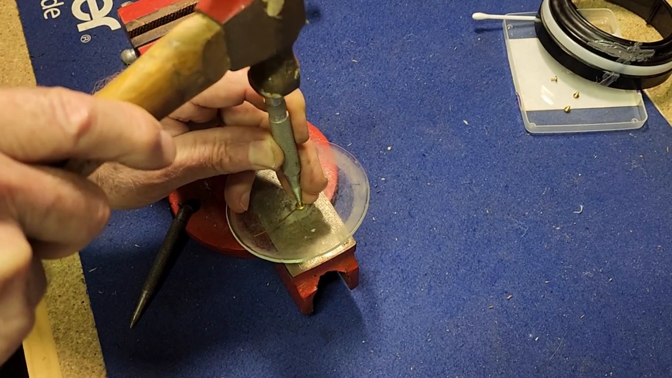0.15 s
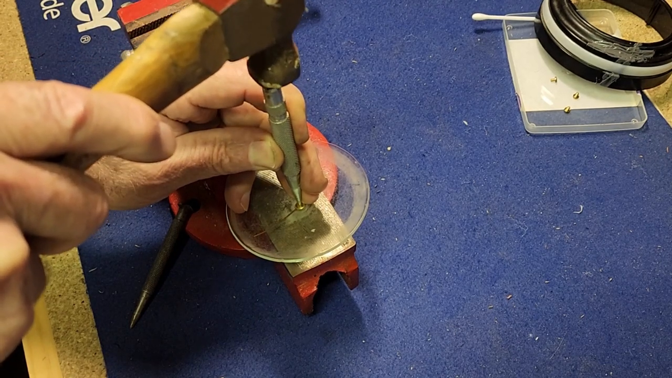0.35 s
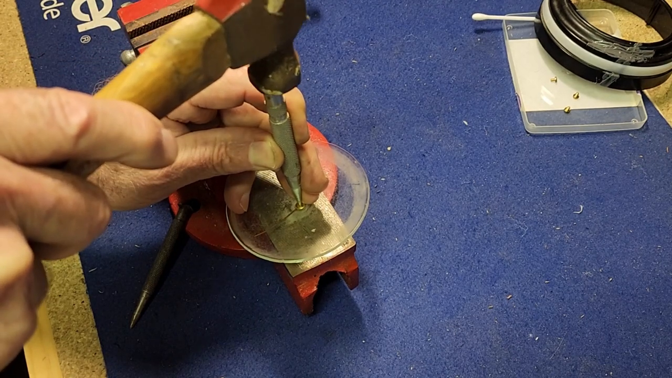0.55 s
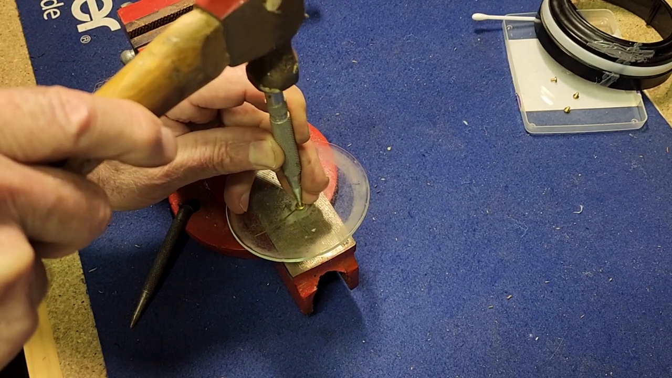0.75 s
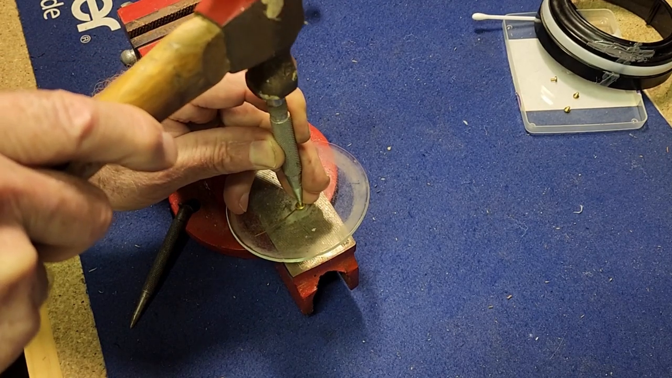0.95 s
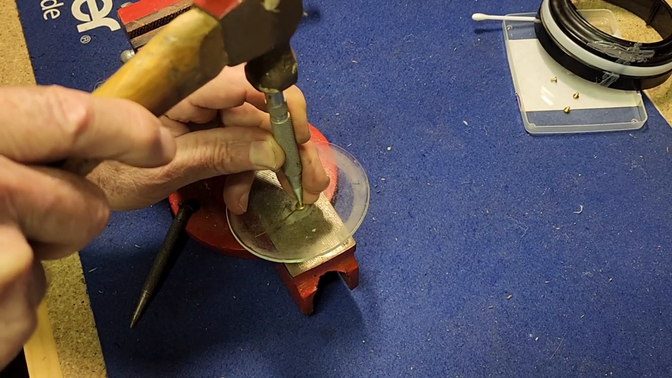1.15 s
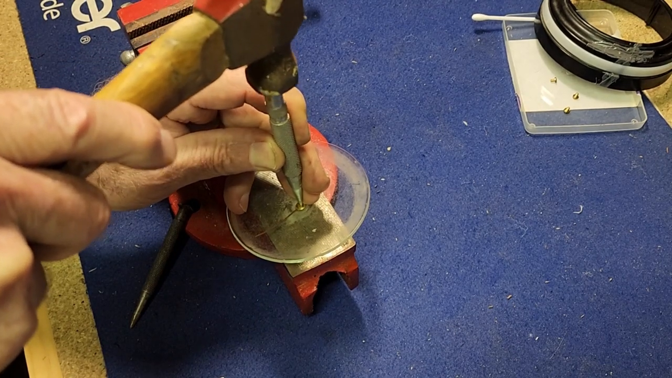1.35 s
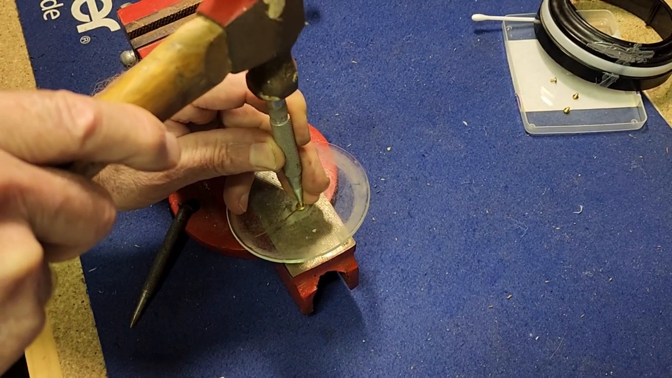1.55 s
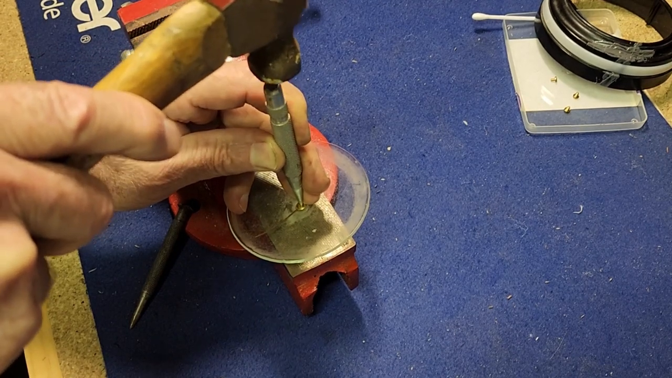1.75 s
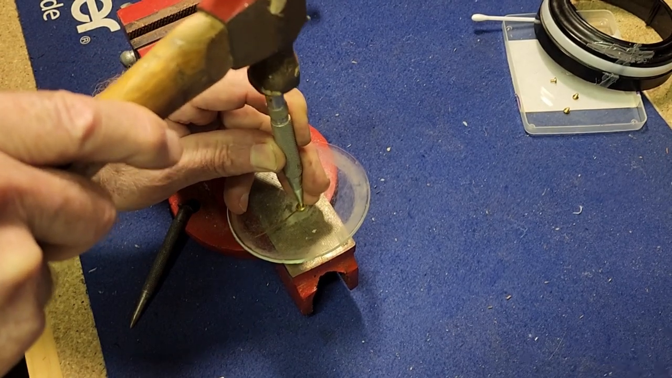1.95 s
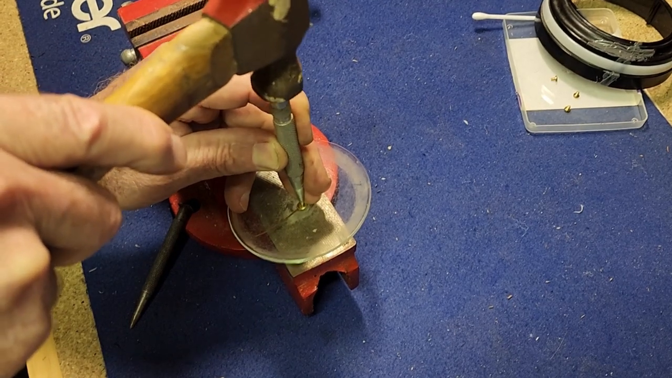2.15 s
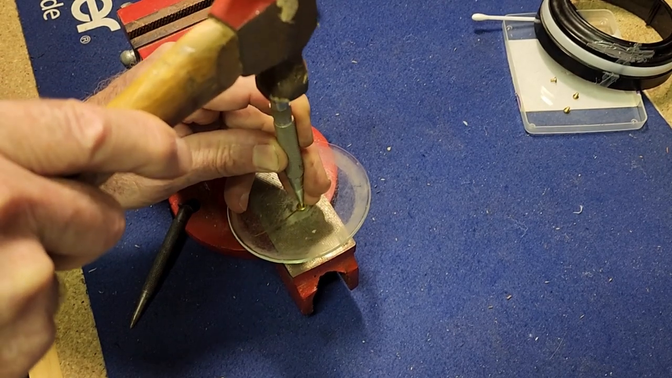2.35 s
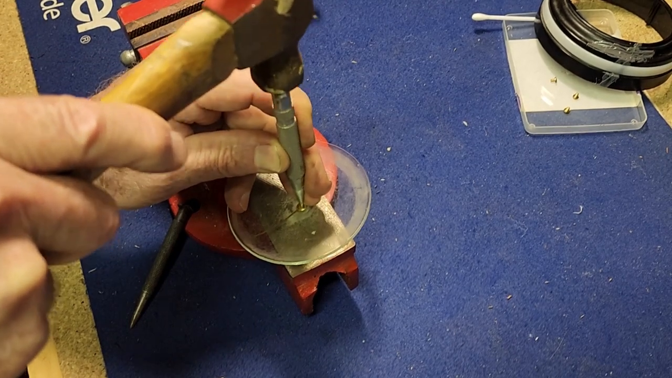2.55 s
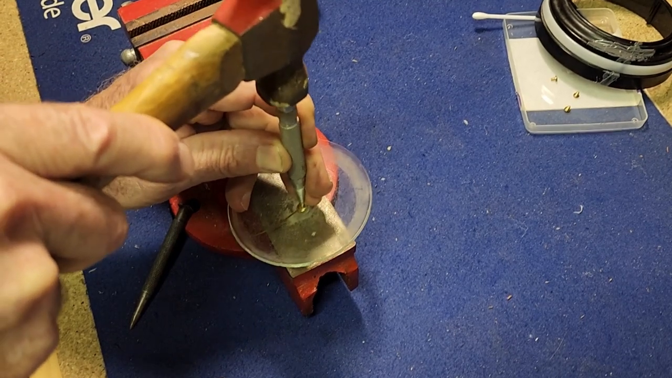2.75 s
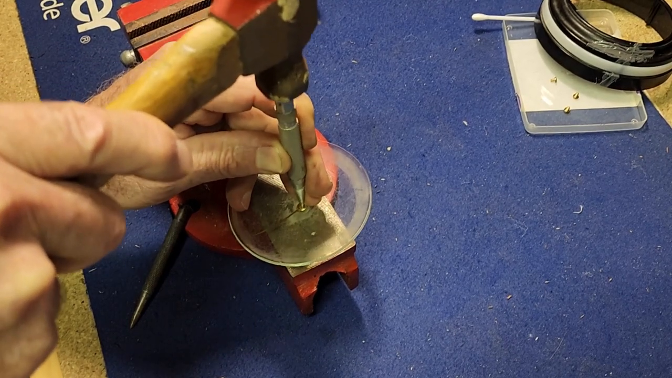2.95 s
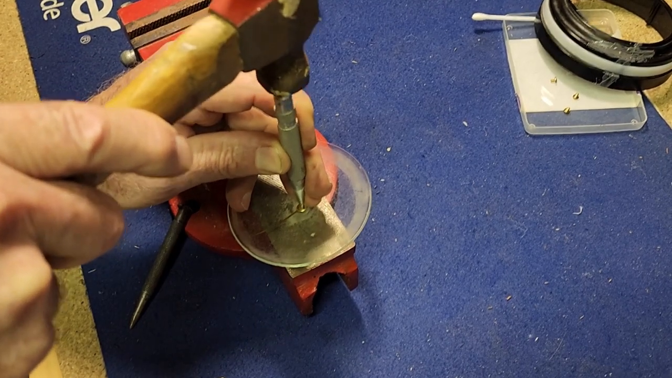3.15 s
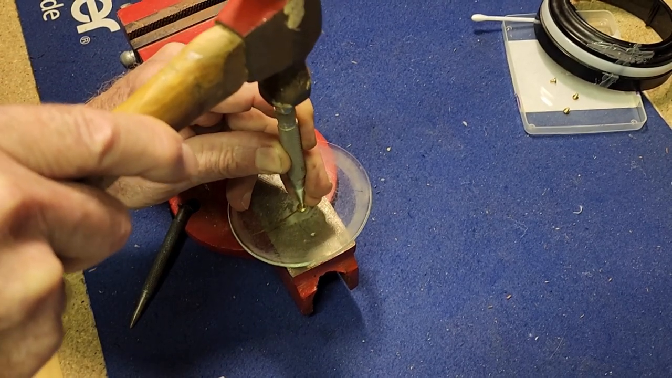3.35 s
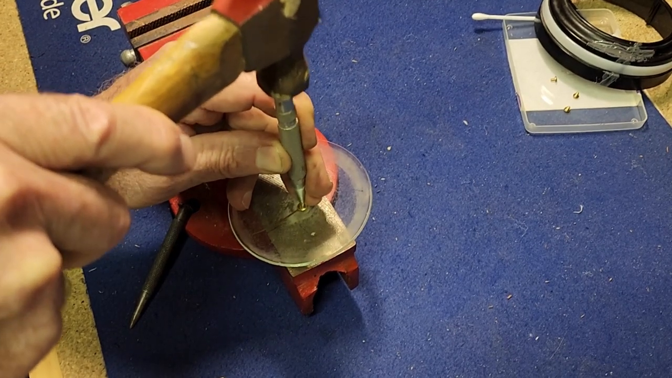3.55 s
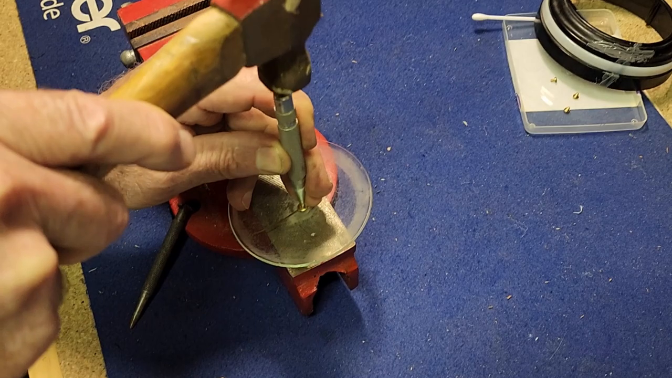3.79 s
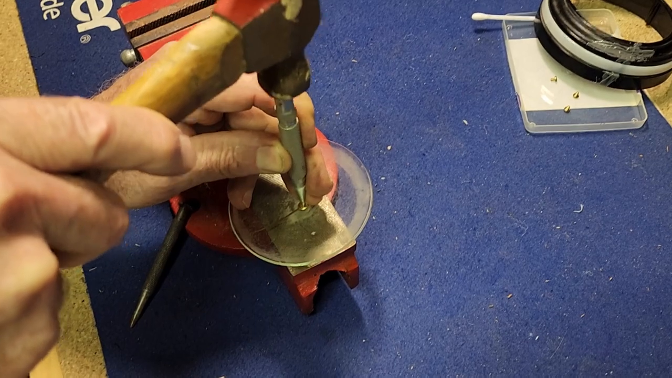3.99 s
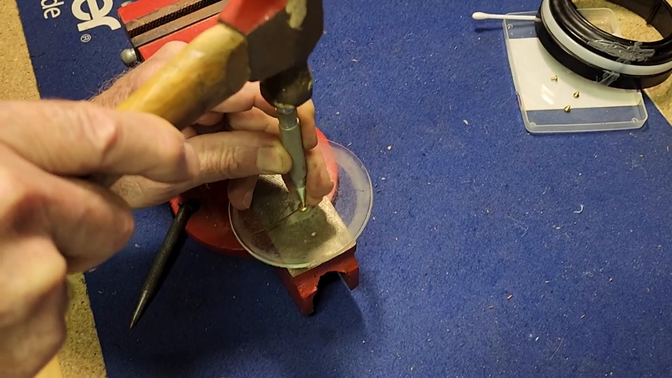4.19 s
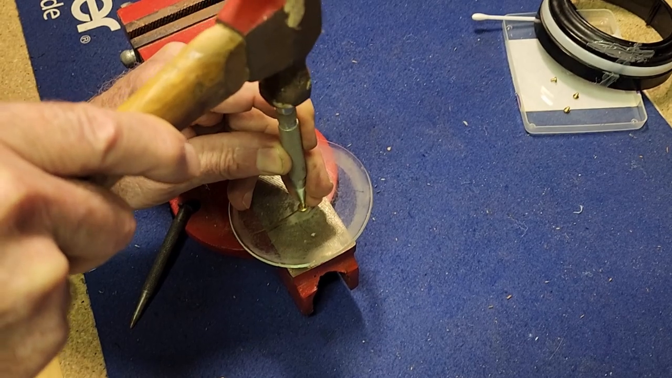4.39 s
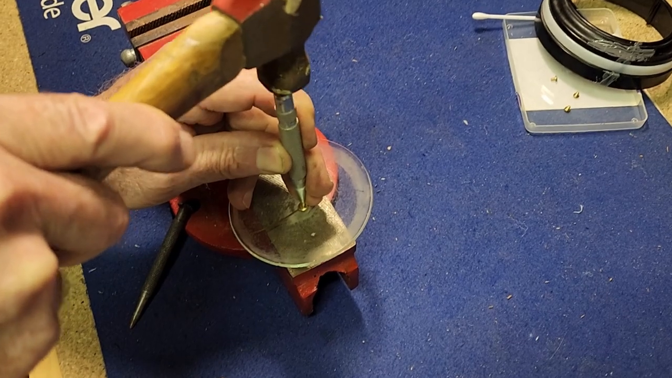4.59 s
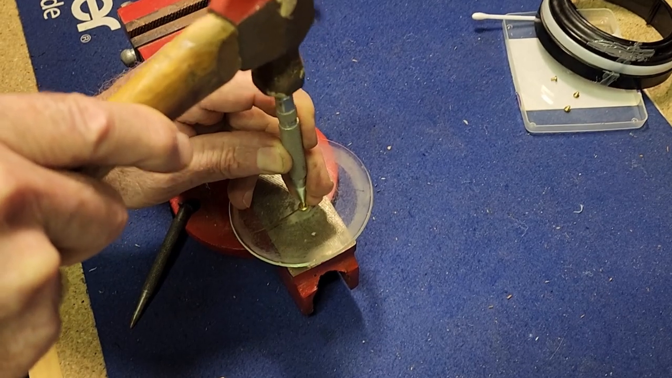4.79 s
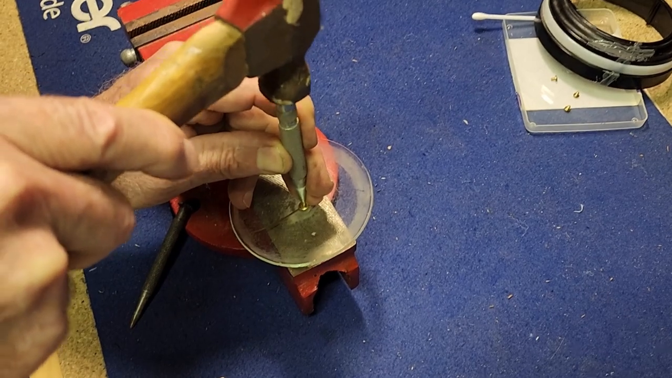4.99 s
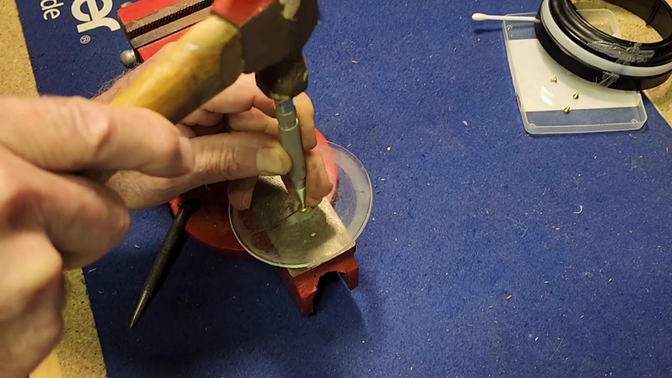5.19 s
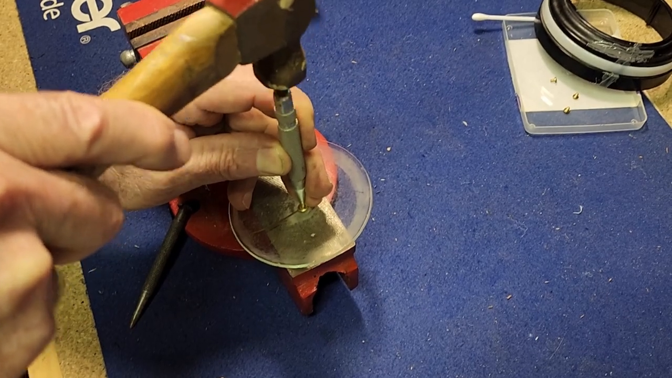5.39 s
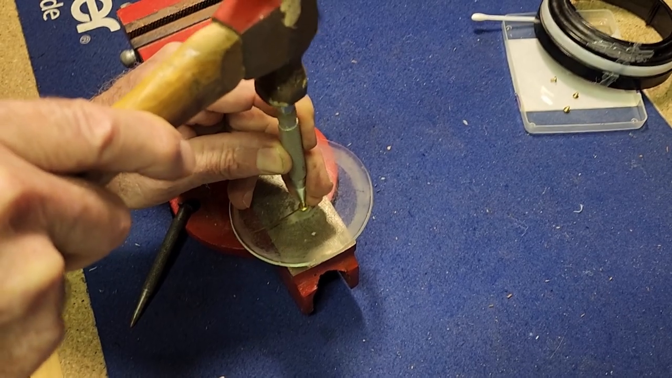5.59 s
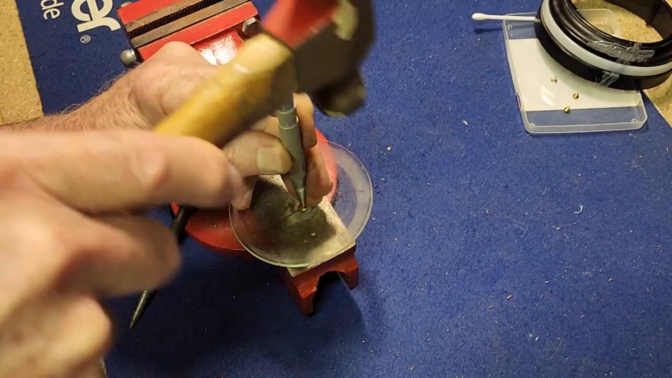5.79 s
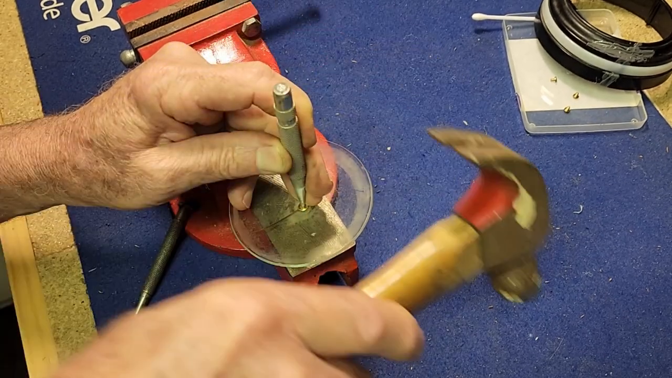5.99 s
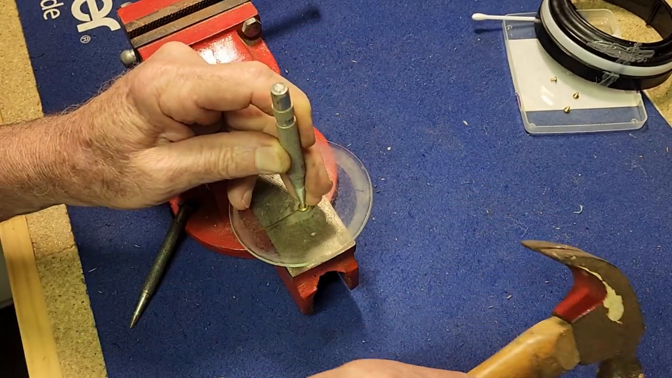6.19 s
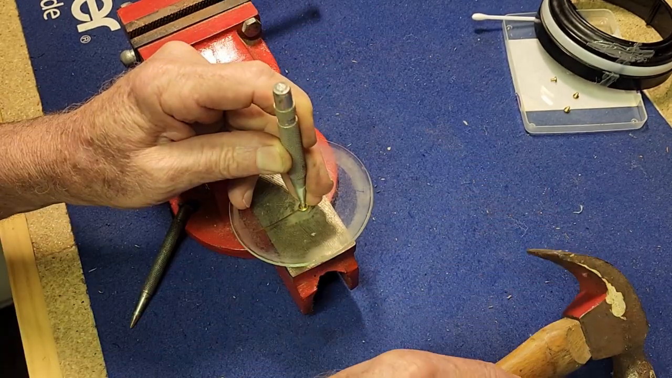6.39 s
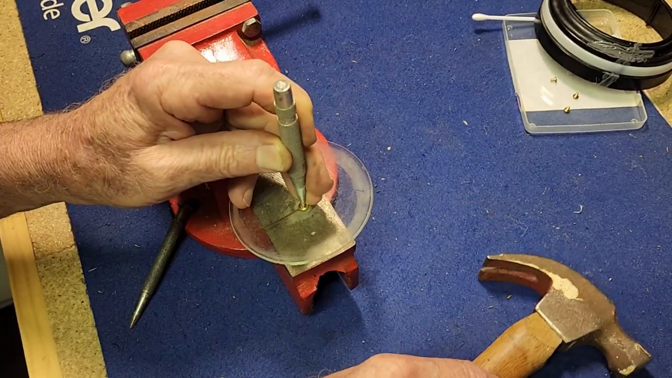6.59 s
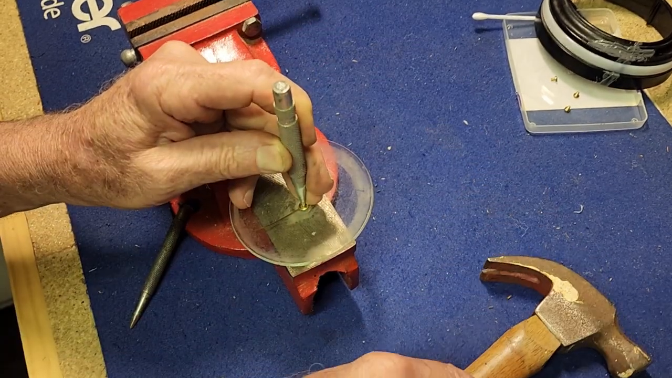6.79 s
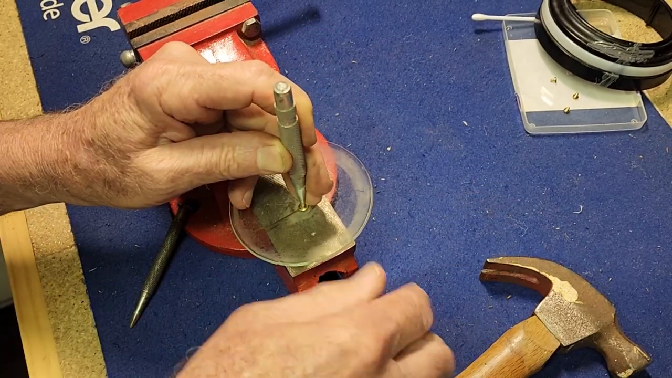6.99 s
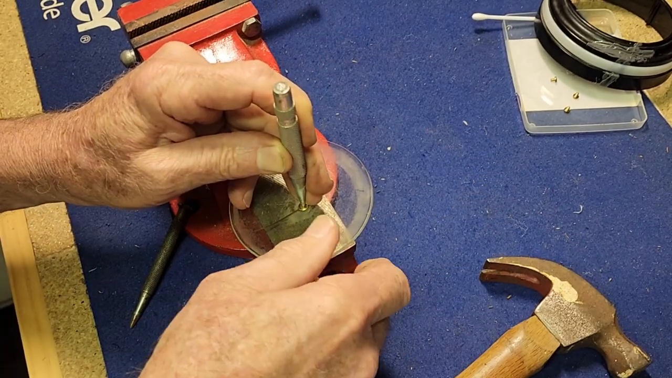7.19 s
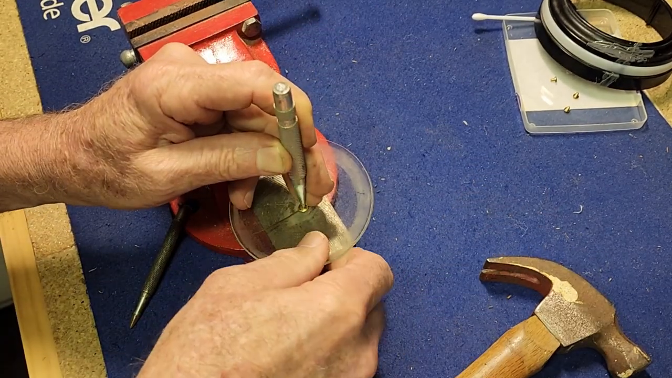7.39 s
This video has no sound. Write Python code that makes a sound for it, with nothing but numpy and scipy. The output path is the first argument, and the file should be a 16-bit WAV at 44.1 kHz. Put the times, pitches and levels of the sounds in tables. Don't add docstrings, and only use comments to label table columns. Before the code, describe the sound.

A hammer taps a steel punch on a small loose anvil in a steady run, then is laid down with dull padded thuds.

```python
import sys
import numpy as np
from scipy import signal
from scipy.io import wavfile
from scipy.ndimage import uniform_filter1d

SR = 44100
rng = np.random.default_rng(int(sys.argv[2]) if len(sys.argv) > 2 else 0)


def generate_wav(sig):
    pcm = np.round(np.clip(np.atleast_2d(sig).T, -1, 1) * 32767).astype(np.int16)
    wavfile.write(sys.argv[1], SR, pcm)


def convert_level_to_amplitude(level_db):
    exponent = np.asarray(level_db, float) / 20
    return 10 ** exponent


N = 328104

# start_s, force_db, anvil_clack_db, punch_ring_db, head_song_db
TAPS = [(-0.004, -16.5, -10, -25.5, -40), (0.868, -37, -14, -48.5, -60.5), (1.1791, -20, -6.5, -25, -49.5),
        (1.483, -19, -3.5, -24.5, -51), (1.779, -14.5, -3.5, -19, -41.5), (2.0704, -16, -4, -24, -46),
        (2.3494, -18, -4, -24, -52), (2.631, -18.5, -4, -37.5, -55), (2.9487, -17.5, -2.5, -44, -49.5),
        (3.2527, -17.5, -3, -33, -69.5), (3.5387, -15, -4.5, -26, -65.5),
        (3.8356, -15.5, -5.5, -23.5, -49.5), (4.1023, -14.5, -5, -27, -64),
        (4.3899, -15.5, -3.5, -23.5, -45.5), (4.6678, -16, -3, -32.5, -57.5),
        (4.9404, -14, -5, -24.5, -47.5), (5.215, -17.5, -5, -26, -54.5), (5.4754, -12.5, -6, -26, -53)]
# start_s, level_db, brightness_db (against the thud), push_ms
THUDS = [(6.403, -22.5, -43, 9.4), (6.5847, -4, -27, 1.47), (6.592, -33.5, 11, 3.4),
         (6.607, -26, -4.5, 1.5), (6.637, -16.5, -46, 4.8), (6.647, -21.5, -43, 2.9), (6.699, -43, -9.5, 9),
         (6.726, -32.5, -23, 7.4), (6.771, -19.5, -30.5, 4.8), (6.793, -16, -44, 8.8),
         (6.845, -27.5, -39, 6.3), (6.876, -33, -43, 6.9)]
# pitch_hz, level_db, t60_s (time to fall 60 dB), left_minus_right_db
ANVIL = [(1035, -11, .035, -1.5), (1385, -11, .05, -.6), (1420, 5, .009, -.4), (1655, -11, .035, .4),
         (1220, -13, .03, -1), (826, -17, .06, -3), (2088, -16, .05, .7), (1520, -15, .04, 0),
         (1750, -14, .03, .5), (2340, -17, .04, 1), (1515, -43, .31, 4.5), (2310, -49, .3, 2)]
# pitch_hz, level_db (per Hz)
CRACK = [(240, -42), (400, -12.5), (680, -29), (1460, -5), (3880, -21.5), (6190, -14.5), (7120, -14),
         (14600, -29), (16500, -44)]

USUAL_FORCE_DB = -18
THUMP_PER_FORCE = 0.46


def read(points, hz):
    f, value = np.transpose(points)
    return np.interp(np.log(hz + 1), np.log(f + 1), value)


def evened(x):
    return x / np.sqrt(np.mean(x ** 2) + 1e-20)


def add(mix, s, sound):
    at = round(s * SR)
    sound = sound[:, max(-at, 0):]
    part = mix[:, max(at, 0):][:, :sound.shape[1]]
    part += sound[:, :part.shape[1]]


def ring(modes, push_ms, spread_db, detune, scatter):
    hz, db, t60, pan_db = np.transpose(modes)[:, :, None, None]
    luck = rng.standard_normal((len(modes), 4, 1))
    lag_s = np.array([[0], [0.00011]])
    t = np.maximum(np.arange(round(0.4 * SR)) / SR - lag_s, 0)
    level_db = db + spread_db * luck[:, :1] + pan_db * np.array([[0.5], [-0.5]]) - 60 * t / t60
    phase = 2 * np.pi * hz * (1 + detune * luck[:, 1:2]) * t + scatter * luck[:, 2:]
    waves = convert_level_to_amplitude(level_db) * np.sin(phase)
    return waves.sum(0) * np.minimum(t / (push_ms / 1000), 1) ** 2


def burst(spectrum, seconds, t60):
    noise = rng.standard_normal((2, round(seconds * SR)))
    hz, t, z = signal.stft(noise, SR, nperseg=256)
    colour = evened(convert_level_to_amplitude(read(spectrum, hz)))
    decay = convert_level_to_amplitude(-60 * t / read(t60, hz)[:, None])
    return signal.istft(z * colour[:, None] * decay, SR, nperseg=256)[1]


def crack(spectrum, t60):
    t = np.arange(round(0.4 * SR)) / SR
    noise = burst(spectrum, 0.41, [(20, 9), (20000, 9)])[:, :len(t)]
    return noise * convert_level_to_amplitude(-60 * t / t60) * np.minimum(t / 0.0023, 1)


def room(sound, wet_db):
    # pitch_hz, t60_s
    echo_times = [(100, 0.11), (420, 0.27), (1100, 0.11), (2900, 0.14), (7700, 0.13), (15000, 0.099)]
    tail = burst([(20, -37.5), (150, -1.5), (600, -6.0), (20000, -8.0)], 0.38, echo_times)
    tail = tail * np.minimum(np.arange(tail.shape[1]) / (0.016 * SR), 1)
    tail = tail / np.linalg.norm(tail[0])
    wet = signal.fftconvolve(sound, tail, axes=1)[:, :sound.shape[1]]
    return sound + convert_level_to_amplitude(wet_db) * wet


def shaking(t):
    power = np.ones(len(t))
    for s, force_db, *_ in TAPS:
        shake_db = 2 + THUMP_PER_FORCE * (force_db - USUAL_FORCE_DB)
        power += (t > s) * convert_level_to_amplitude(shake_db - 60 * abs(t - s) / 5) ** 2
    for s, db, *_ in THUDS:
        power += (t > s) * convert_level_to_amplitude(20.5 + db - 60 * abs(t - s) / 1.5) ** 2
    lumps = evened(uniform_filter1d(rng.standard_normal(len(t)), size=15))
    return 10 * np.log10(power) + 4.33 * lumps


def room_tone():
    # pitch_hz, level_db (per Hz)
    tone_colour = [(15, -33.5), (26, -12), (43, -19), (56, -0.5), (80, -0.5), (142, -14.5), (232, -32),
                   (296, -23), (330, -30.5), (900, -37.5), (1090, -38), (2090, -43.5), (3230, -48.5),
                   (8140, -57.5), (16500, -71.5)]
    # pitch_hz, likeness (1 = the same)
    likeness = [(60, 1), (240, -0.29), (950, -0.43), (3770, 0.86), (15000, 0.0051)]
    # time_s, level_db
    hiss = [(0, -5), (5.5, -0.5), (6.1, -0.5), (6.501, 1.5), (6.8, 3.5), (7.05, 1.5), (7.44, -0.5)]
    frames, hz = N // 512 + 5, np.fft.rfftfreq(2048, 1 / SR)
    a, b, c, d, patches = rng.standard_normal((frames, 1025, 5)).T
    patches = evened(uniform_filter1d(uniform_filter1d(patches, 9, 0), 7, 1))
    t = np.arange(frames) * 512 / SR
    rumble_db, hiss_db = shaking(t), np.interp(t, *np.transpose(hiss))
    rumble_db = rumble_db - rumble_db.mean()
    low = np.clip(1.1 - hz / 1200, 0, 1)[:, None]
    same = np.clip(read(likeness, hz), -1, 1)[:, None]
    left = a + 1j * b
    right = same * left + np.sqrt(1 - same ** 2) * (c + 1j * d)
    level_db = read(tone_colour, hz)[:, None] + 0.5 * patches + low * rumble_db + (1 - low) * hiss_db
    z = np.array([left, right]) * convert_level_to_amplitude(level_db)
    return convert_level_to_amplitude(-48) * evened(signal.istft(z, nperseg=2048, noverlap=1536)[1][:, :N])


def taps():
    # time_s, firmness_db
    seat = [(0, -5), (1.2, -7), (1.5, -7), (1.8, -3.5), (2.35, -6.5), (2.65, 4), (4.1, 2), (4.4, 5),
            (5.5, 1.5)]
    # pitch_hz, level_db, t60_s, left_minus_right_db
    upper = [(2760, -9, .05, 1.2), (2970, -8, .03, 1.5), (3170, -10, .04, 1.8), (3320, -9, .035, 2.5),
             (2560, -14, .04, 1)]
    shank = [(4600, -7, .025, 4.5), (4770, -5, .045, 5), (4925, -4, .035, 4), (4840, -8, .02, 5)]
    punch = [(5945, -9, .03, 4), (6117, -6, .13, 10), (6075, -12, .09, 6), (6150, -3, .045, 6)]
    treble = [(7250, -12, .015, -1.5), (7630, -8, .018, -1.2), (8260, -14, .03, -1.6),
              (8620, -7, .015, -2.5), (8950, -13, .03, -2.2), (9385, -9, .03, -1.8), (9745, -14, .04, -.7),
              (10150, -14, .02, .4), (10550, -15, .07, .6), (11400, -15, .02, 1.5), (12700, -11, .025, 6),
              (15000, -15, .015, 4)]
    bench_modes = [(45.2, -7, 0.38, -0.92), (76.7, -3.5, 0.19, -1.1), (98.3, -8, 0.29, -1.2),
                   (125.6, -1, .14, -1.4), (151, -16, 0.094, -1.6), (196.3, -12.5, 0.19, -1.3),
                   (280, -17.5, 0.1, .3), (376, -12, 0.07, -0.27)]
    steel, bench = np.zeros((2, 2, N))
    for s, force_db, clack_db, punch_db, _ in TAPS:
        seat_db = np.interp(s, *np.transpose(seat))
        extra_db = force_db - USUAL_FORCE_DB
        upper_db = -19.5 + seat_db + 0.37 * extra_db
        shank_db = -17.5 + 0.17 * extra_db
        thump_db = -24 + 0.2 * seat_db + THUMP_PER_FORCE * extra_db

        low = convert_level_to_amplitude(clack_db - 2.5) * ring(ANVIL, 1.0, 1.5, 0.003, 0.35)
        low += convert_level_to_amplitude(upper_db + 3.0) * ring(upper, 0.57, 1.7, 0.0089, 0.7)
        low += convert_level_to_amplitude(shank_db) * ring(shank, 0.75, 1.4, 0.0031, 1.0)
        low += convert_level_to_amplitude(punch_db + 8) * ring(punch, 1.1, 0.93, 0.0015, 0.78)
        rattle = convert_level_to_amplitude(-0.5) * crack(CRACK, 0.0043) + convert_level_to_amplitude(-5.0) * crack(CRACK, 0.063)
        high = convert_level_to_amplitude(force_db + 6) * (ring(treble, 0.6, 2, 0.006, 2.5) + rattle)
        add(steel, s, low + high)
        add(bench, s + 0.002, convert_level_to_amplitude(thump_db + 4.5) * ring(bench_modes, 1.5, 0.29, 0.051, 0.026))
    return room(steel, -12.0) + bench


def song():
    # time_s, left_minus_right_db, left_lead_radians
    song_side = [(0, 3.8, -2.0), (2.1, 3.1, -2.3), (2.7, 5, -3.1), (4, 7.5, -3), (5.5, 8, -2.8)]
    pitch_hz, t60_s = 7900, 0.69
    s, db, t = np.transpose(TAPS)[0], np.transpose(TAPS)[-1], np.arange(N) / SR
    last = np.searchsorted(s, t) - 1
    level_db = uniform_filter1d(db[last] + 5.5 - 60 * (t - s[last]) / t60_s, 201)
    when, pan_db, lead = np.transpose(song_side)
    sides = np.array([[0.5], [-0.5]])
    fresh_start = rng.random(len(s))[last]
    phase = 2 * np.pi * (pitch_hz * t + fresh_start) + np.interp(t, when, lead) * sides
    return convert_level_to_amplitude(level_db + np.interp(t, when, pan_db) * sides) * np.sin(phase)


def bounces():
    # start_s, level_db
    landings = [(0.01, -37.5), (1.506, -18), (1.799, -16.5), (1.812, -22.5), (2.093, -14.5), (2.119, -22.5),
                (2.372, -19.5), (2.654, -14), (2.674, -16.5), (2.964, -32.5), (2.984, -28), (3.268, -23.5),
                (3.28, -36), (3.559, -13), (3.578, -26.5), (3.861, -14), (3.88, -23.5), (4.119, -18),
                (4.135, -30.5), (4.413, -19.5), (4.434, -17.5), (4.681, -12), (4.961, -14.5), (4.983, -20),
                (5.235, -16.5), (5.254, -25), (5.494, -18)]
    out = np.zeros((2, N))
    for s, db in landings:
        landing = ring(ANVIL[:5], 1.2, 1.5, 0.01, 0.4) + convert_level_to_amplitude(-18) * crack(CRACK, 0.03)
        add(out, s, convert_level_to_amplitude(db + 3) * landing)
    return room(out, -12.5)


def laying_down():
    # start_s, level_db, pitch_hz, t60_s, width_octaves
    ticks = [
        (6.288, -67.5, 3000, 0.042, 1),
        (6.412, -60.5, 3420, 0.065, 0.19),
        (6.414, -66, 5890, 0.048, 1.2),
        (6.608, -25.5, 4800, 0.021, 1.1),
        (6.697, -50.5, 2600, 0.048, 0.98),
        (6.769, -49, 5900, 0.017, 1.6),
        (6.788, -51.5, 1390, 0.076, .12),
        (6.884, -61, 6000, 0.016, 1.5),
        (7.371, -44, 12020, 0.013, 3.8),
    ]
    # pitch_hz, level_db, t60_s, left_minus_right_db
    pad = [(87.8, -14.5, 0.41, -1.5), (118, 9.5, 0.055, -1.2), (171.2, -7, 0.12, -1.4),
           (241, -4.5, 0.12, -1), (351, -9, 0.078, -.6), (604, -19, 0.14, -.4), (1068, -24, 0.094, .3),
           (1360, -29.5, .07, -0.002)]
    # pitch_hz, level_db (per Hz)
    scuff = [(180, -43.5), (300, -9), (614, -6), (701, -16.5), (1360, -14.5), (1780, -22), (4750, -31),
             (16000, -45.5)]
    out = np.zeros((2, N))
    for s, db, bright_db, push_ms in THUDS:
        progress = np.minimum(np.arange(0.012 * SR) / (push_ms * SR / 1000), 1)
        push = np.sin(np.pi * progress) ** 2
        thud = signal.oaconvolve(ring(pad, 3.6, 1.8, 0.039, 0.057), push[None] / push.sum())
        thud = thud[:, :round(0.4 * SR)]
        add(out, s, convert_level_to_amplitude(db) * (-thud + convert_level_to_amplitude(bright_db) * crack(scuff, 0.16)))
    for s, db, hz, t60, octaves in ticks:
        peak = [(hz / 4 ** octaves, -48), (hz, 0), (hz * 4 ** octaves, -48)]
        add(out, s, convert_level_to_amplitude(db) * crack(peak, t60))
    out = signal.sosfilt(signal.butter(2, 68, "high", fs=SR, output="sos"), out)
    return room(out, -30.0)


def scene():
    return taps() + bounces() + song() + laying_down() + room_tone()


def smear(x, grain_db, patchy_db):
    size = abs(signal.stft(x, nperseg=2048, noverlap=1024)[2])
    jump = np.maximum(np.diff(size, axis=2, prepend=1), 0)
    bands = np.repeat(rng.standard_normal((2, 65, size.shape[2])), 16, axis=1)[:, :1025]
    grain = uniform_filter1d(jump, 5, axis=1) * convert_level_to_amplitude(grain_db + patchy_db * bands)
    grain[:, :40] = 0
    grain = grain * np.exp(2j * np.pi * rng.random(size.shape))
    return x + signal.istft(grain, nperseg=2048, noverlap=1024)[1][:, :N]


def band_limit(x):
    return signal.sosfilt(signal.butter(12, 16860, fs=SR, output="sos"), x)


def record(dry):
    x = signal.sosfilt(signal.butter(2, 40, "high", fs=SR, output="sos"), dry)
    x = smear(np.clip(x, -1, 1), grain_db=-27.5, patchy_db=7.5)
    treble_limit = signal.firwin(255, 16550, window=("kaiser", 7), fs=SR)
    x = signal.oaconvolve(x, treble_limit[None], "same")
    return band_limit(np.clip(x, -1, 1))


dry = scene()
out = record(dry)
generate_wav(out)
```